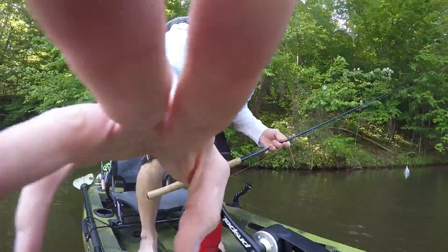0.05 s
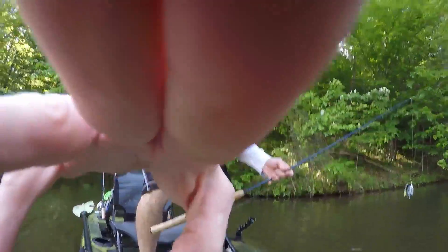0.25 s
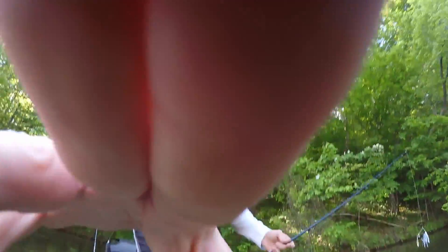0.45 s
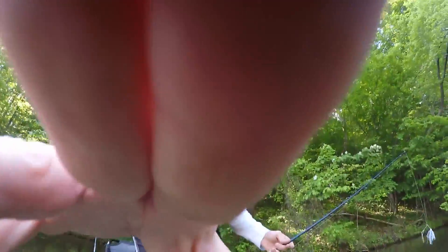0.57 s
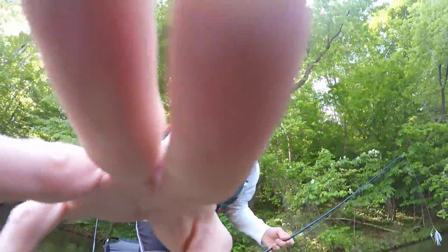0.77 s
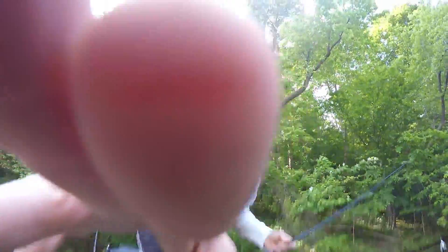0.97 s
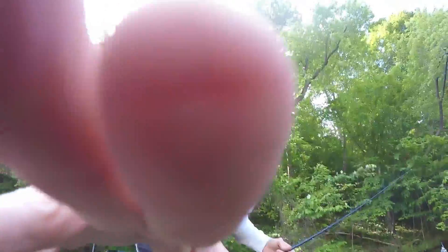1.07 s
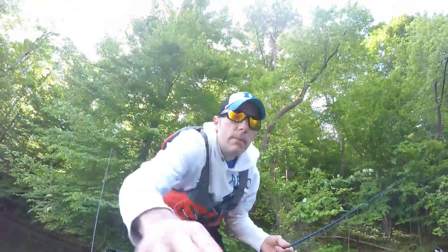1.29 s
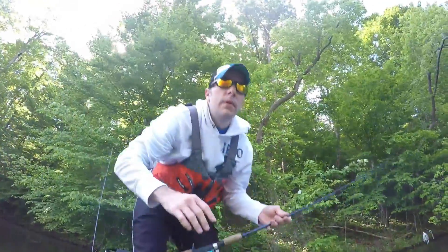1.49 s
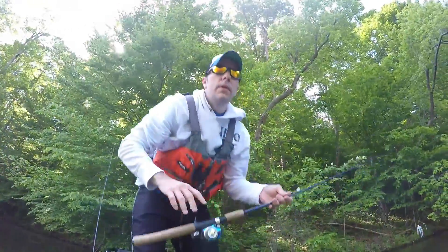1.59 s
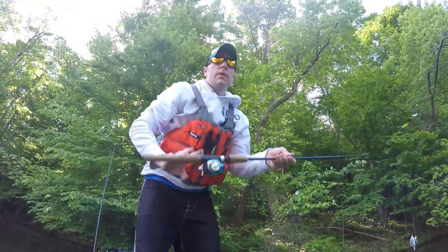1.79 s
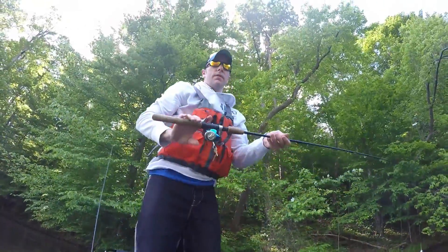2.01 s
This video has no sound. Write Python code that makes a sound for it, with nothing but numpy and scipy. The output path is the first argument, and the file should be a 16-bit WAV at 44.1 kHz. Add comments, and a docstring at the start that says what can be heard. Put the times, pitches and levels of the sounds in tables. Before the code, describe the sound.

Fingers click and rub on the microphone's plastic case, with dull knocks on a kayak.

```python
"""Handling noise on a kayak camera.

Fingers rub and click on the plastic case of a mounted camera; the hardest click overloads it.
Gear and feet knock dully on the hollow hull, and a jacket rustles as the angler straightens up.
Behind it: a low rumble, faint river air and a distant whistling bird."""
import sys
import numpy as np
from scipy import signal
from scipy.fft import rfft, irfft
from scipy.io import wavfile
from scipy.ndimage import uniform_filter1d

SR = 44100
rng = np.random.default_rng(int(sys.argv[2]) if len(sys.argv) > 2 else 0)


def pcm_store(signal):
    """Save signal as 16-bit PCM."""
    levels = np.round(np.clip(np.atleast_2d(signal), -1, 1) * 32767)
    wavfile.write(sys.argv[1], SR, levels.astype(np.int16).T)


N = 90404
TIME = np.arange(N) / SR


def amp(db):
    """Decibels to gain."""
    return 10 ** (np.asarray(db) / 20)


def unit_rms(x):
    """Scales to rms 1."""
    return x / np.sqrt(np.mean(x ** 2) + 1e-20)


def spectrum_db(points, hz):
    """Interpolates (Hz, dB) points on a log-frequency axis."""
    point_hz, db = np.transpose(points)
    return np.interp(np.log(hz + 1), np.log(point_hz), db)


def envelope(points):
    """Gain over time from (s, dB) points."""
    return amp(np.interp(TIME, *np.transpose(points)))


def add(mix, start_s, sound):
    """Mixes a sound in at a time."""
    part = mix[max(round(start_s * SR), 0):][:len(sound)]
    part += sound[:len(part)]


def noise(points):
    """Steady noise at rms 1, shaped by (Hz, dB) points."""
    gain = amp(spectrum_db(points, np.fft.rfftfreq(N, 1 / SR)))
    return unit_rms(irfft(rfft(rng.standard_normal(N)) * gain, N))


def min_phase(db):
    """Minimum-phase impulse response from dB per bin."""
    log_gain = np.log(amp(np.r_[db, db[-2:0:-1]]))
    return np.fft.ifft(np.exp(np.conj(signal.hilbert(log_gain)))).real


def ring(modes, t):
    """Decaying sines of alternating sign from (Hz, dB, T60 s) rows."""
    return sum((-1) ** k * amp(db - 60 * t / t60_s) * np.sin(2 * np.pi * hz * t)
               for k, (hz, db, t60_s) in enumerate(modes))


# Rumble spectrum. Each row: frequency in Hz, relative level in dB.
RUMBLE_SPECTRUM = [(10, -22), (25, -6), (42, -1.5), (60, -3), (85, -11), (125, -14), (170, -21),
                   (300, -37.5), (800, -69.5)]
# Rumble envelope. Each row: time in seconds, level in dB.
RUMBLE_ENVELOPE = [(0, -39), (0.6, -42), (1.0, -40), (1.15, -35), (1.35, -39.5), (1.5, -42), (2.05, -41)]


def rumble():
    """Low noise that drifts in level."""
    return noise(RUMBLE_SPECTRUM) * envelope(RUMBLE_ENVELOPE)


# River air spectrum. Each row: frequency in Hz, relative level in dB.
AIR_SPECTRUM = [(60, -13.5), (200, -2), (310, 2), (420, 3.5), (520, -4), (700, -12.5), (1100, -22.5),
                (1800, -22.5), (2600, -20), (3600, -24), (5000, -22.5), (7000, -31), (12000, -34.5),
                (14400, -34), (15300, -38), (16000, -57.5)]


def river_air(level_db=-53):
    """Faint, steady air over the river."""
    return noise(AIR_SPECTRUM) * amp(level_db)


# Bird call. Each row: start in seconds, length in seconds, start and end pitch in Hz, level in dB.
WHISTLE_NOTES = [(0.717, .09, 2570, 2510, -63.5), (0.834, .07, 2310, 2220, -71),
                 (1.07, 0.097, 2630, 2530, -60.5), (1.199, 0.044, 2280, 2220, -68.5),
                 (1.486, 0.052, 2720, 2780, -67), (1.653, 0.076, 2690, 2710, -71),
                 (1.898, 0.189, 2250, 2324, -68)]


def bird(echo_db=-6, echo_t60_s=0.81):
    """Pure gliding whistles echo in the trees."""
    direct = np.zeros(N)
    for start_s, length_s, start_hz, end_hz, db in WHISTLE_NOTES:
        progress = np.arange(0, length_s, 1 / SR) / length_s
        pitch_hz = start_hz + (end_hz - start_hz) * progress
        arch = np.sqrt(2 * np.sin(np.pi * progress))
        add(direct, start_s, amp(db) * arch * np.sin(2 * np.pi * np.cumsum(pitch_hz) / SR))
    woods = rng.standard_normal(SR) * amp(-60 * TIME[:SR] / echo_t60_s)
    return direct + amp(echo_db) * signal.fftconvolve(direct, woods / np.linalg.norm(woods))[:N]


# Rustle spectrum. Each row: frequency in Hz, relative level in dB.
JACKET_SPECTRUM = [(400, -4.5), (1000, -1), (2000, 2), (3000, 0), (3800, -1.5), (5000, -1.5), (7500, -10),
                   (15000, -23.5)]
# Rustle envelope. Each row: time in seconds, level in dB.
JACKET_ENVELOPE = [(1.25, -77.5), (1.42, -71), (1.52, -61.5), (1.66, -67.5), (1.8, -70), (2.05, -70.5)]


def jacket():
    """Cloth rustles in one soft swell as the angler straightens up."""
    return noise(JACKET_SPECTRUM) * envelope(JACKET_ENVELOPE)


# Blows on the hull. Each row: start in seconds, strength in dB.
HULL_BLOWS = [(0.1389, -38), (0.637, -46), (0.771, -36), (0.916, -52.5), (1.0020, -54), (1.822, -43),
              (1.9007, -31)]
# Hull modes. Each row: frequency in Hz, gain in dB, T60 in seconds.
HULL_MODES = [(190.1, -6, 0.092), (260, -5.5, .08), (604, 4, 0.046), (726, -1.5, 0.062), (883, -16, 0.056),
              (1127, -1.5, 0.034), (1273, -15, 0.038), (1543, -8.5, 0.022), (1900, -7.5, 0.0083),
              (2330, -13, .025)]


def hull_knocks(rise_s=0.00117, rattle_db=-21, rattle_decay_s=0.0025):
    """Soft blows with a little rattle ring the hollow hull."""
    force, t = np.zeros(N), TIME[:SR // 5]
    for start_s, db in HULL_BLOWS:
        blow = amp(rattle_db) * rng.standard_normal(len(t)) * np.exp(-t / rattle_decay_s)
        blow[0] += 1  # the impact itself
        add(force, start_s, amp(db) * blow)
    hull = ring(HULL_MODES, t) * (1 - np.exp(-t / rise_s))
    return signal.fftconvolve(force, hull)[:N]


# Shoves on the mount. Each row: start in seconds, level in dB, frequency in Hz, T60 in seconds.
MOUNT_SHOVES = [(0.233, -13.5, 58.95, 0.15), (1.052, -13, 41, 0.1), (1.079, -19.5, 62.7, .1),
                (1.173, -23.5, 40, 0.1)]


def mount_rocking(rise_s=0.0013):
    """The mount rocks for a few slow cycles after a hard press."""
    out, t = np.zeros(N), TIME[:SR // 2]
    attack = 1 - np.exp(-t / rise_s)
    for start_s, db, hz, t60_s in MOUNT_SHOVES:
        add(out, start_s, -amp(db - 60 * t / t60_s) * attack * np.sin(2 * np.pi * hz * t))
    return out


# Case peaks and dips; the last row is a top-end roll-off that dulls clicks and rubs.
# Each row: centre in Hz, width in Hz, gain in dB.
TOUCH_EQ = [(491.2, 140, 5.5), (1065, 380, 6.5), (1666, 350, -6), (2100, 96, 4), (2555, 300, 5.5),
            (3220, 200, -4.5), (3750, 450, 1.5), (4423, 400, -9.5), (5048, 600, 4), (5720, 300, 5),
            (6470, 1100, -4.5), (7300, 320, 1.5), (9195, 1000, -8), (15200, 1400, -11)]


def touch_eq_db(hz):
    """Colour of clicks and rubs: the case's peaks and dips, plus a top-end roll-off."""
    return sum(db / (1 + (2 * (hz - centre_hz) / width_hz) ** 2)
               for centre_hz, width_hz, db in TOUCH_EQ)


# Finger slides. Each row: start, length and fade in seconds, midpoint level in dB, swell in dB.
FINGER_SLIDES = [(0.137, .093, 0.0024, -34, 16.5), (0.231, 0.027, .002, -39, -12),
                 (0.251, 0.12, 0.081, -46, 4), (0.363, 0.12, 0.051, -46, -9), (0.457, 0.099, 0.036, -47, 0),
                 (0.521, 0.012, 0.0016, -54.5, -2), (0.685, 0.022, .003, -47.5, -8.5),
                 (0.707, 0.0201, 0.0015, -40.5, 12), (0.915, 0.028, 0.006, -41.5, -17),
                 (1.045, 0.046, 0.003, -50, -9)]
# Friction spectrum. Each row: frequency in Hz, relative level in dB.
RUB_SPECTRUM = [(100, -5), (450, 1.5), (1000, 0), (2000, -6.5), (2900, 1), (4200, -1.5), (5500, -6),
                (7500, -11.5), (9500, -19), (15000, -21)]


def finger_rubs(grain_db=2.5, eq_depth=0.98, fft_size=1024):
    """Skin slips over the case in dense tiny grains."""
    force, hz = np.zeros(N), np.fft.rfftfreq(fft_size, 1 / SR)
    hiss = rng.standard_normal(N)
    roughness = unit_rms(uniform_filter1d(rng.standard_normal(N), size=30))
    grains = unit_rms(hiss * amp(grain_db * roughness))
    for start_s, length_s, fade_s, db, swell_db in FINGER_SLIDES:
        t = np.arange(0, length_s, 1 / SR)
        fade = np.minimum(np.minimum(t, length_s - t) / fade_s, 1)
        add(force, start_s, fade * amp(db + swell_db * (t / length_s - 0.5)))
    response = min_phase(spectrum_db(RUB_SPECTRUM, hz) + eq_depth * touch_eq_db(hz))
    return signal.fftconvolve(force * grains, response / np.linalg.norm(response))[:N]


# Band centres of a contact's spectrum, in Hz.
CONTACT_BANDS_HZ = [150, 420, 1000, 2400, 5000, 11000]
# Finger contacts. Each row: start in seconds, grit length in seconds, grit share from 0 to 1,
# note of the touched spot in Hz, its lift or damping in dB, then gain in dB for each band.
CONTACTS = [ (0.2295, 0.0021, 0.91, 4830, 10, 13, 24, 17.5, 22, 25, 9),
            (0.2327, .0012, 0.27, 282.5, 2, 22.5, 30.5, 18.5, 12.5, 9, 6),
            (0.2444, 0.0017, 0.98, 1500, 15, 13, 24.5, 11, 15, 7.5, -31),
            (0.6889, 0.0014, 1, 5270, 14.5, -9, 2.5, -17, -2, -9, -35),
            (0.6921, .0012, 0.69, 1070, 5, -18, -21, 2.5, -2.5, -4, -25),
            (0.7222, 0.0019, 0.75, 1490, -14, 2.5, 7.5, 18.5, 10, 7.5, -17.5),
            (1.0517, 0.0011, 0.48, 2593, 7.5, -7, 4.5, -1, 3.5, -8, -28),
            (1.0525, 0.001, 0.59, 1318, 5, 7.5, 19, 21.5, 4.5, -3.5, -19.5),
            (1.1640, 0.0022, 1, 4200, 14.5, -1, 0, 3, -5, -12, -19),
            (1.1648, 0.00075, 0.11, 870, -13.5, 4.5, 20, 8, -39, -20, -27.5), ]
# Case modes that ring on. Each row: frequency in Hz, gain in dB, T60 in seconds.
CASE_MODES = [(270, -49.5, 0.058), (385, -54.5, 0.029), (484, -52.5, 0.042), (2164, -57, 0.15)]
SPOT_RELATIVE_WIDTH, GRIT_FROM_HZ = 0.17, 730
SHIVER_DB, SHIVER_T60_S, SHIVER_TOP_HZ = -18, 0.035, 3500


def finger_clicks(fft_size=4096):
    """Each contact is a push, brief grit and a shiver of loose parts; the case rings on."""
    out, t, hz = np.zeros(N), TIME[:fft_size], np.fft.rfftfreq(fft_size, 1 / SR)
    shiver_db = SHIVER_DB - 10 * np.log10(1 + (hz / SHIVER_TOP_HZ) ** 2)
    for start_s, grit_s, grit_share, spot_hz, spot_db, *bands_db in CONTACTS:
        contact_db = spectrum_db(list(zip(CONTACT_BANDS_HZ, bands_db)), hz)
        spot_shape = 1 / (1 + (2 * (hz / spot_hz - 1) / SPOT_RELATIVE_WIDTH) ** 2)
        colour_db = contact_db + touch_eq_db(hz) + spot_db * spot_shape
        # Grit and push share the power; the lows are plain push.
        grit_power = np.clip(grit_share, 0.01, 0.999) ** 2 / (1 + (GRIT_FROM_HZ / (hz + 50)) ** 4)
        push = min_phase(colour_db + 10 * np.log10(1 - grit_power))
        add(out, start_s, push)
        grit = rng.standard_normal(fft_size) * np.exp(-(t / grit_s) ** 2)
        shiver = rng.standard_normal(fft_size) * amp(-60 * t / SHIVER_T60_S)
        for force, db in (grit, 10 * np.log10(grit_power)), (shiver, shiver_db):
            response = min_phase(colour_db + db)
            add(out, start_s, signal.fftconvolve(force / np.linalg.norm(force), response))
    return out + signal.fftconvolve(out, ring(CASE_MODES, t))[:N]


def scene():
    """All sources at one microphone."""
    handling = finger_clicks() + mount_rocking() + finger_rubs()
    return (handling + hull_knocks() + bird() + rumble() + river_air() + jacket())[None]


def record(dry):
    """The input clips just under full scale, then is low-passed."""
    ceiling, cutoff_hz = 0.88, 16300
    low_pass = signal.firwin(511, cutoff_hz, window=("kaiser", 9), fs=SR)
    return signal.oaconvolve(np.clip(dry, -ceiling, ceiling), low_pass[None], "same")


dry = scene()
out = record(dry)
pcm_store(out)
```